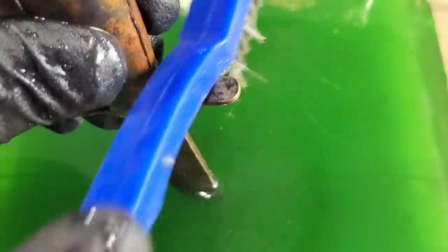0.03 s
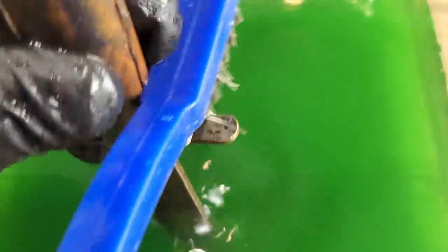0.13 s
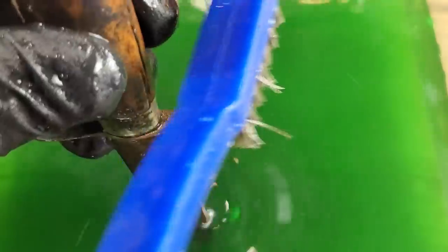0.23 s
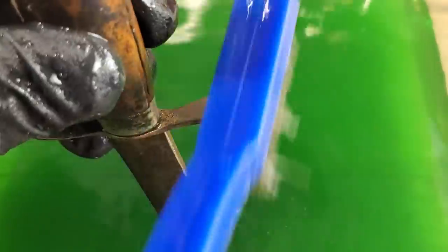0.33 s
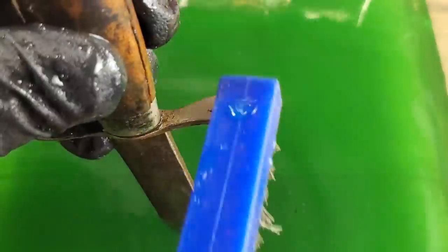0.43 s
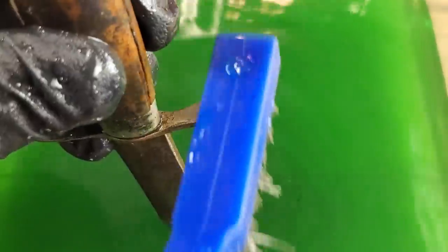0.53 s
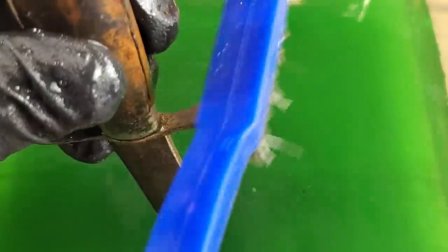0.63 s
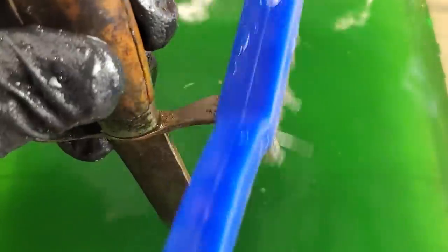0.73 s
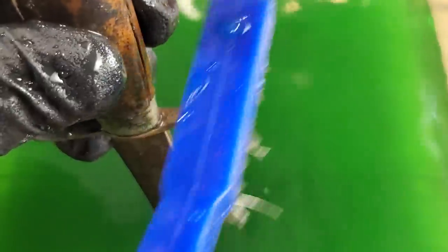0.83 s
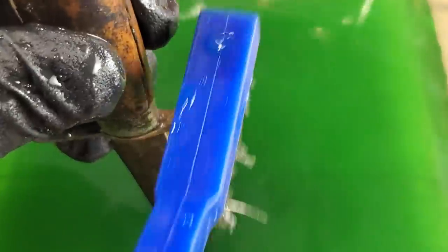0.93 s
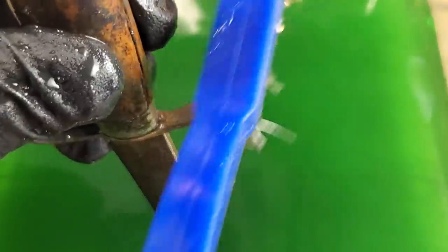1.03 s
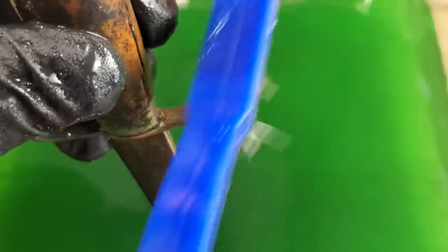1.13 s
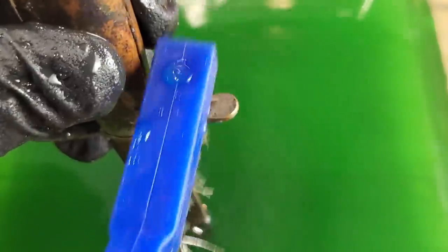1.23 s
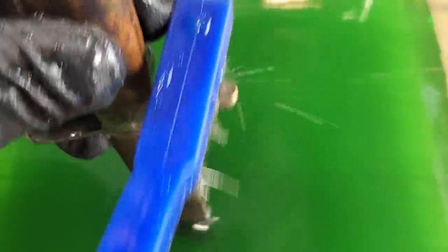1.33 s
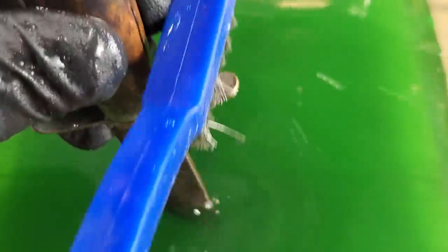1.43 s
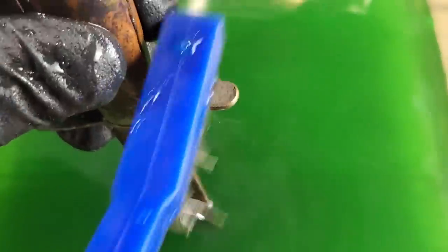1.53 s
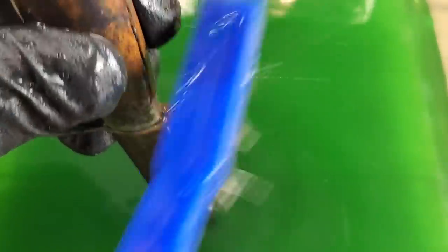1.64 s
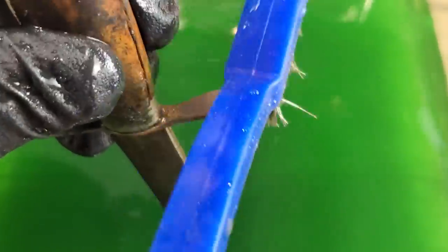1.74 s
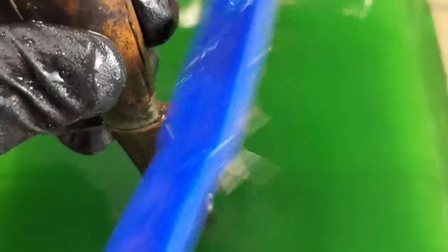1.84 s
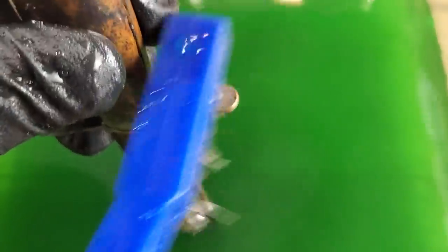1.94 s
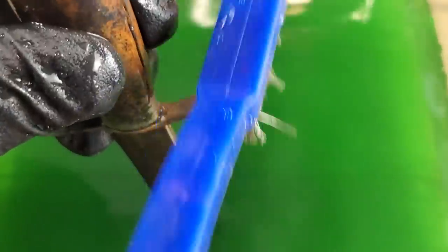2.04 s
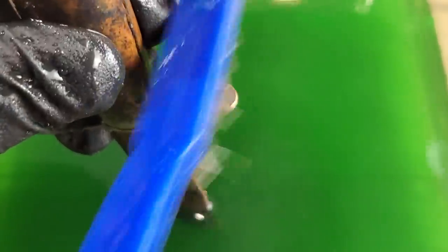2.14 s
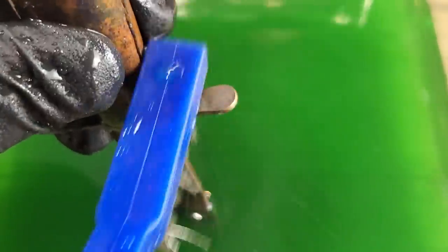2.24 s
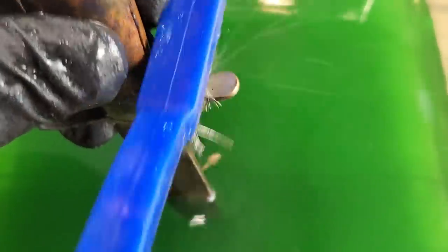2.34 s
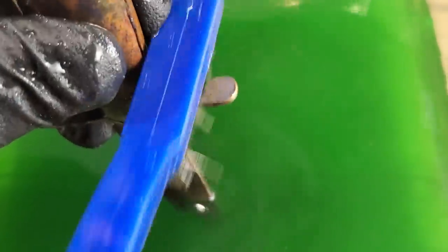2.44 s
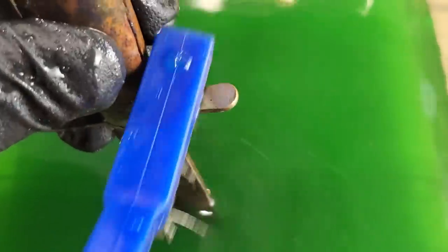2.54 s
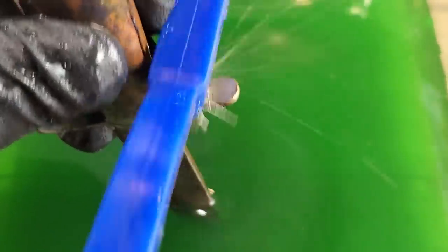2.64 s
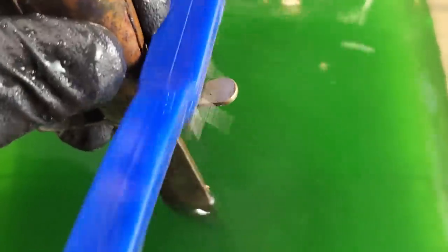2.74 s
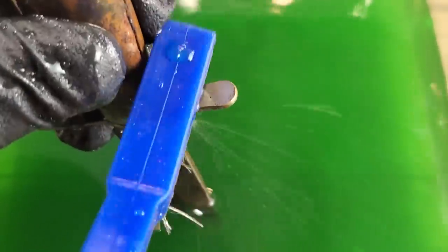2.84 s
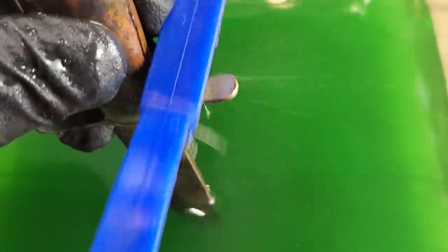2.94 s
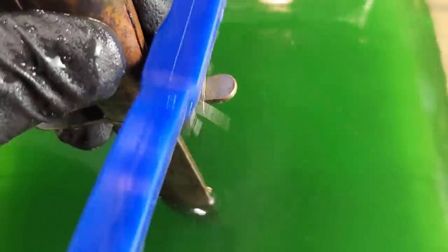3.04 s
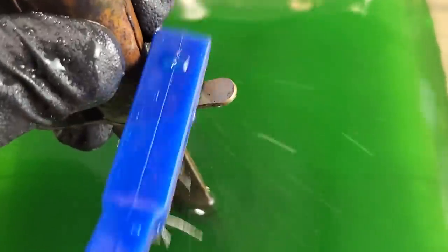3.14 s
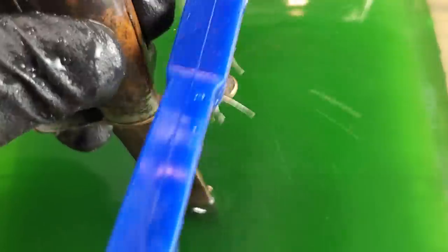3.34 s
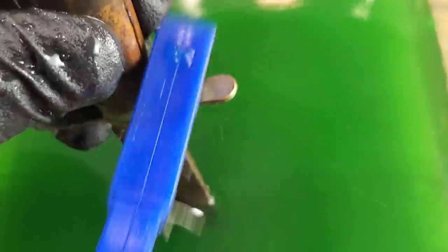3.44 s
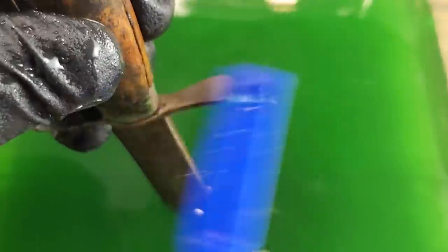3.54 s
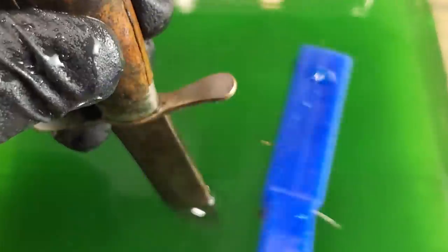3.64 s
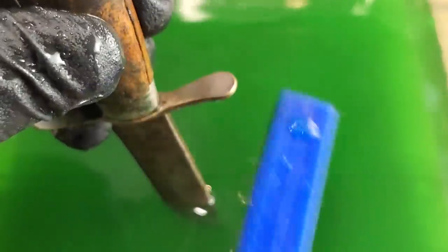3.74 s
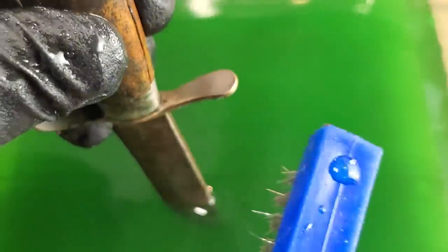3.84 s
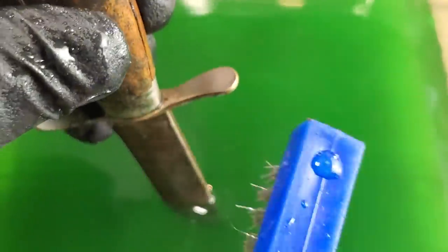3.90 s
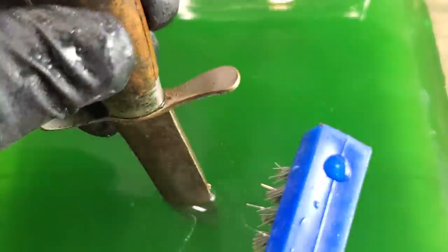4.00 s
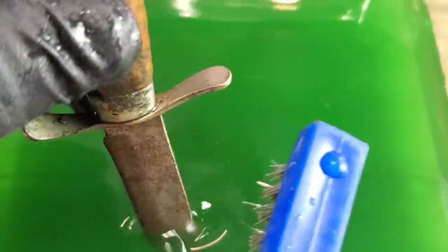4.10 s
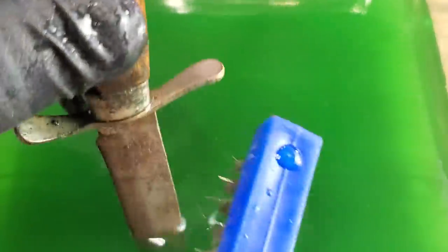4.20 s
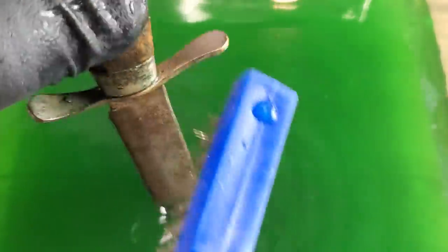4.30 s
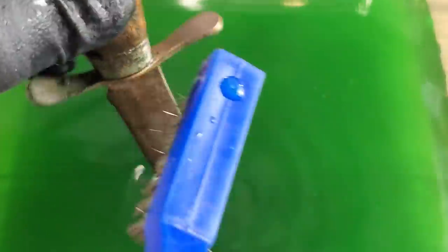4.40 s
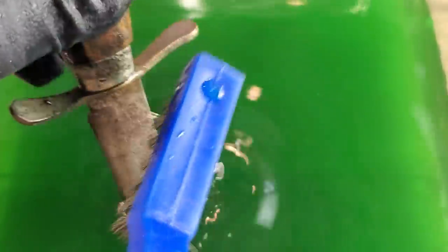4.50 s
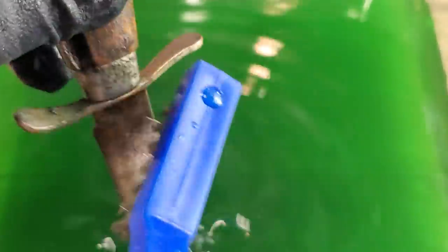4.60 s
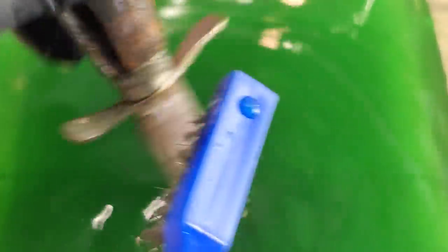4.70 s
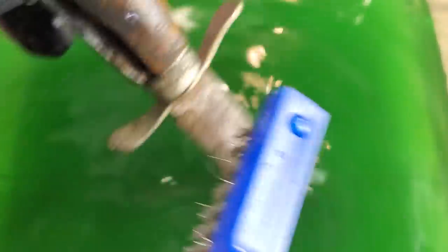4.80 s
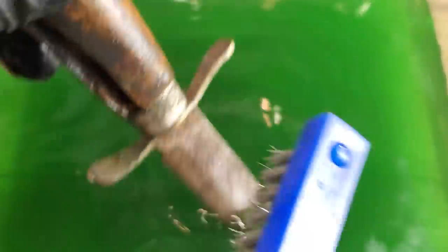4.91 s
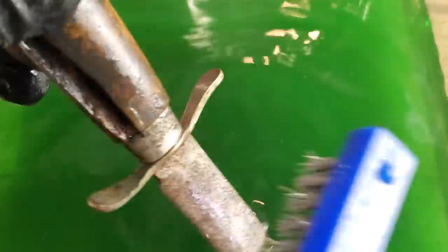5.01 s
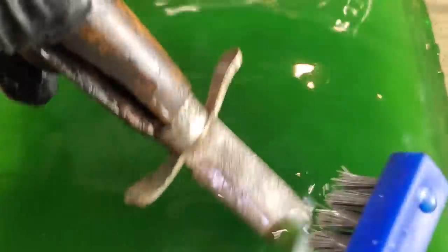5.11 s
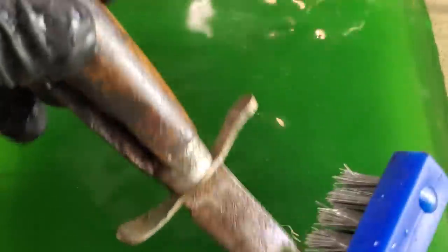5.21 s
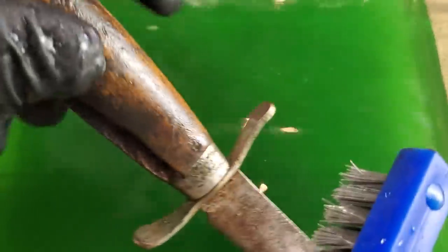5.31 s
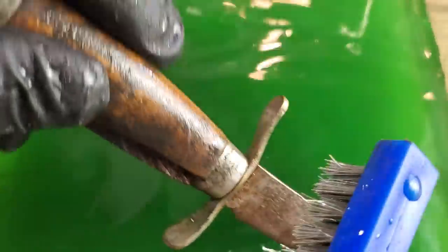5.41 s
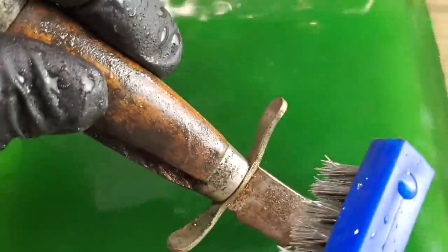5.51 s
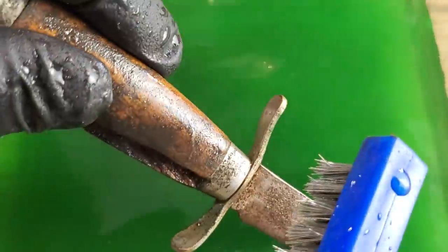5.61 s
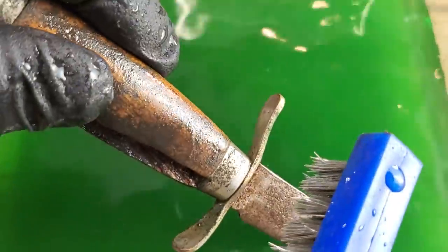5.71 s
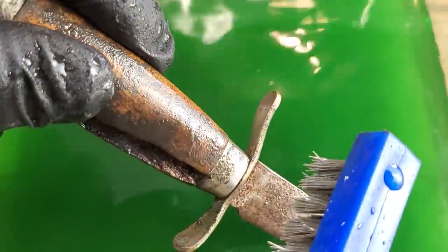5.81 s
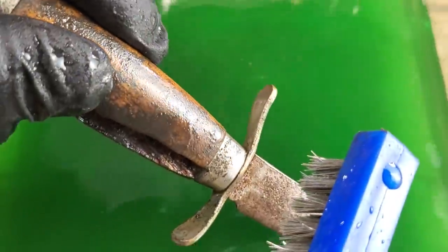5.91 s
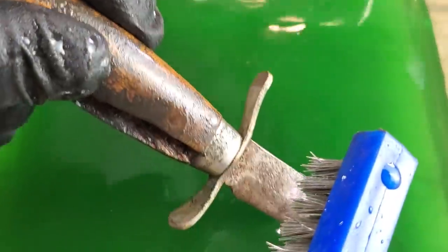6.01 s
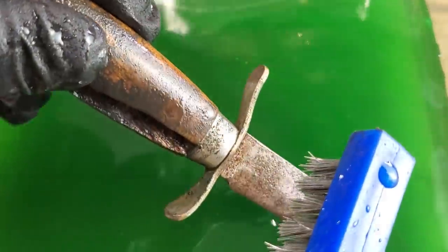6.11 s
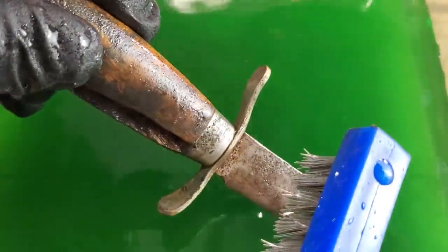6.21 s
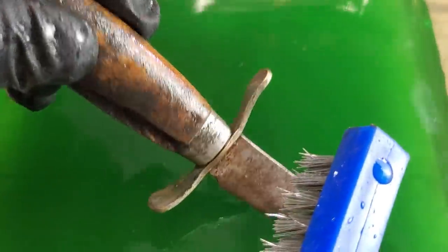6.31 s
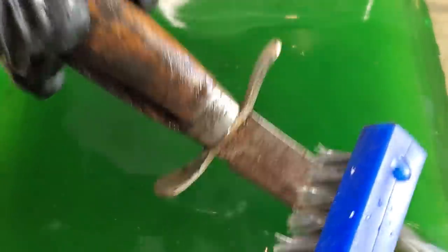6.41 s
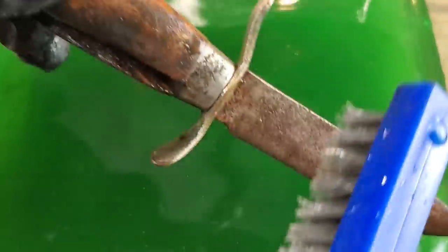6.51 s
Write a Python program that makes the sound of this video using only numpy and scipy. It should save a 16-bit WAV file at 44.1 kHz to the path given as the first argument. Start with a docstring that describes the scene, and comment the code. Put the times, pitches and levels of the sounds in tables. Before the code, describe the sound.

Very close stereo: a wire brush scrapes a wet rusty blade, first in broken strokes, then in a fast steady back-and-forth rasp of bright hiss, gritty scratch and sharp snags over a low tray thud. At about three and a half seconds it stops. Small clicks follow, then two clear metallic knocks of the blade tip on the tray, a fainter one, and almost silence with slight rubbing.

```python
"""Scrubbing a rusty blade over a tray

A wire brush scrubs a wet rusty blade held over a shallow tray, in quick strokes to and fro.
The wires slip and snag in clumps: random clicks, filtered into hiss and scratch, shake brush, blade and tray.
Later the blade tip knocks, a sum of fading sines and a crack, and slides on the tray bottom, as filtered clicks.
Two close microphones each hear it by their own short paths off the liquid and the tray walls."""
import sys
import numpy as np
from scipy import signal
from scipy.fft import rfft, irfft
from scipy.io import wavfile
from scipy.ndimage import uniform_filter1d

SR = 44100
rng = np.random.default_rng(int(sys.argv[2]) if len(sys.argv) > 2 else 0)


def master_out(mix):
    """Clip the mix to full scale and print it as 16-bit PCM to the path in sys.argv[1]."""
    frames = np.transpose(np.atleast_2d(mix))
    ceiling = np.clip(frames, -1, 1)
    pcm = np.round(ceiling * 32767).astype(np.int16)
    wavfile.write(sys.argv[1], SR, pcm)


def voltage_ratio(decibels):
    """Convert decibels (scalar or array-like) to amplitude ratios, 20 dB per decade."""
    exponent = np.asarray(decibels, float) / 20
    return 10 ** exponent


N = 288855   # length in samples

# Levels in the tables are relative: later filters, paths and mixing still act on them.

# faint high squeaks: start t/s, length t/s, first f/Hz, last f/Hz, level/dB
SQUEAKS = [(5.732, 0.033, 9250, 9300, -92), (5.803, .15, 10600, 10250, -74), (6.12, 0.059, 9750, 9600, -78)]
# low modes of the tray: f/Hz, level/dB, time to fade by 60 dB t/s
TRAY_MODES = [(48, -7, 0.22), (78.4, -20, 0.51), (123.36, 5.5, 0.36), (178.1, -2.5, 0.42), (205.8, 2, 0.22),
              (274, 5.5, 0.1), (348, -7, 0.17), (405.2, -3, 0.17), (477, -14, 0.12)]
# thumps that reach the tray: t/s, bottom level/dB, walls level/dB (at 200 Hz)
THUMPS = [(0.018, -38.5, -39.5), (0.564, -45, -44), (0.864, -37.5, -41.5), (0.897, -46, -41),
          (1.34, -30.5, -39.5), (1.537, -42, -65), (1.677, -37.5, -73), (2.293, -34, -51),
          (2.561, -37.5, -66.5), (2.917, -36, -55), (2.949, -37.5, -59.5), (3.101, -43, -53.5),
          (3.22, -35.5, -65), (3.278, -44, -44), (3.688, -38, -38), (3.718, -38, -34), (3.735, -38.5, -32),
          (3.795, -45, -46.5), (4.415, -45, -39.5), (4.639, -33, -29.5), (4.835, -49.5, -52),
          (5.141, -45, -37), (5.161, -59, -36.5), (5.181, -44, -41), (5.224, -44, -68),
          (5.293, -44.5, -57.5)]
# faint rubbing of the tip and rustle of the resting wires: t/s, rub level/dB, rustle level/dB
SLIDE = [(0.0, -50.5, -67), (0.26, -59.5, -81), (0.53, -57.5, -79.5), (0.7, -55, -83), (0.85, -65.5, -80),
         (0.93, -58, -68), (3.5, -58.5, -61), (3.58, -67, -82), (3.68, -70.5, -89), (3.74, -75, -66.5),
         (4.0, -58, -76.5), (4.05, -57, -64), (4.2, -56.5, -73.5), (4.4, -59, -72.5), (4.62, -61.5, -67),
         (4.72, -73.5, -57), (4.83, -60.5, -80), (4.95, -62.5, -67), (5.0, -84.5, -85),
         (5.13, -64.5, -74.5), (5.16, -56, -62), (5.27, -63.5, -67.5), (5.39, -69, -74), (5.47, -80, -84.5),
         (5.65, -63, -93.5), (5.8, -61, -80), (6.05, -60, -75.5), (6.25, -63.5, -84), (6.55, -65, -78)]
# tone of the rubbing tip: f/Hz, level/dB (per Hz)
RUB_TONE = [(180, -38), (300, -7), (579, -9.5), (777, -17.5), (2520, -8.5), (4500, -13.5), (6800, -25.5),
            (7400, -30.5), (11000, -53.5), (18700, -120)]
# resonances of the half-drowned blade under a slow rub: f/Hz, width f/Hz, level/dB
DROWNED_BLADE = [(561, 84, 0), (1050, 1200, 1), (2578, 85, -6), (3650, 100, -7), (4780, 79, -13),
                 (5600, 210, -23.5), (7060, 380, -11)]
# tone of the rustling wires: f/Hz, level/dB (per Hz)
RUSTLE_TONE = [(2000, -20.5), (5000, -2.5), (9000, -8.5), (13500, -6), (15700, -6.5), (16400, -36.5)]
# tone of the tray rumbling under the tip: f/Hz, level/dB (per Hz)
RUMBLE_TONE = [(12, -36), (20, -18.5), (48, -6), (97, -3.5), (128, 1), (201, -19), (289, -10), (400, -27),
               (520, -31), (880, -120)]
# blade tip on the tray: t/s, peak level/dB, hardness (tilt in dB per octave),
# ring length as a share of each mode's fading time, crack level/dB (against the peak)
KNOCKS = [(3.6882, -28, 2.5, 0.57, 1), (3.7203, -33, -6, 0.4, -11), (3.737, -26, -1.5, 0.37, 1),
          (3.792, -52.5, 14.5, 0.5, 1), (3.897, -57.5, 14, 0.52, -3), (4.0273, -42.5, 4, 0.9, -10),
          (4.0457, -45.5, 1.5, 0.87, -3), (4.1276, -42.5, 2, 0.52, -6.5), (4.4137, -13, -0.2, 0.54, -9),
          (4.6369, -16.5, 2.4, 0.51, -2.5), (4.7157, -33.5, 5.5, 0.51, -7),
          (4.8355, -39.5, -2.5, 0.62, 3.5), (4.928, -58, 4.5, 1, 4), (5.1385, -27, 5, 0.44, -4.5)]
# which of the four spots of the blade each knock lands on: spot number
KNOCK_SPOTS = [0, 0, 0, 0, 0, 1, 2, 3, 1, 2, 1, 3, 3, 3]
# blade modes: f/Hz
BLADE_HZ = [603, 1217, 1381, 1460, 1866, 1895, 2537, 3237, 3762, 3973, 4540, 5632, 5900, 6050, 6735, 6866,
            8130, 8460, 9080, 9455]
# the same modes: time to fade by 60 dB t/s (before the share), level/dB when struck at each of four spots
BLADE_MODES = [(0.21, -10.5, -32.5, -12.5, -6.5), (0.25, -30, -2, -1.5, -49), (0.64, -29, -10, -7, -5),
               (0.074, 1.5, -34.5, -29, -33), (0.41, -1.5, -11.5, -34.5, -10), (0.1, 11.5, 0, -19, -26),
               (0.091, -22, -0.5, -13.5, -9), (0.42, -3.5, -9, -14, -12), (0.14, 0.5, -14, 4, -5),
               (0.13, -30, -13, -19.5, -12), (0.14, -13.5, -19, -14.5, -17.5), (0.13, -25, -20, -17, -10.5),
               (0.1, -34, -31.5, -20.5, -10), (0.15, -7.5, -16.5, -30, -5.5), (0.15, -24, -25.5, -10, -17),
               (0.066, -18, -25, -19, -12.5), (.12, -40, -36, -30, -25), (0.087, -24, -36.5, -24, -17),
               (0.029, -27, -37, -26.5, -18), (0.089, -38, -32, -33, -14.5)]
# strokes of the brush from turn to turn: start t/s, length t/s, share of the way where it is fastest
# (held within 0.1 to 0.9), hiss of the wire tips level/dB, scratch of the shanks level/dB
STROKES = [(0.003, 0.036, 0.43, -51, -48.5), (0.052, 0.12, 1, -44.5, -45.5),
           (0.334, 0.058, 0.25, -76, -63.5), (0.537, 0.15, 0.74, -50, -50), (0.686, 0.11, 0.54, -63, -65),
           (0.898, 0.2, 0.43, -43.5, -50.5), (1.088, 0.14, 0.77, -40, -48), (1.237, .15, 0.98, -39, -48),
           (1.436, 0.13, 0.61, -42.5, -50), (1.557, 0.17, 0.7, -41.5, -47.5),
           (1.733, 0.16, 0.57, -49.5, -56), (1.906, 0.13, 0.88, -40.5, -50), (2.046, 0.15, 0.77, -41, -48),
           (2.23, 0.13, 0.56, -35.5, -42), (2.379, 0.12, 0.67, -39.5, -45.5),
           (2.525, 0.14, 0.36, -35.5, -40), (2.69, 0.14, 0.7, -39.5, -45.5), (2.846, 0.13, 0.54, -35, -41),
           (3.003, 0.14, 0.55, -40, -45.5), (3.156, 0.14, 0.64, -39.5, -43.5),
           (3.311, 0.17, 0.65, -42, -46), (3.487, 0.043, 0.6, -68, -45.5)]
# how hard the hand presses the brush on the blade: t/s, level/dB
GRIP = [(0.0, -44), (0.17, -37), (0.36, -56), (0.6, -41.5), (0.76, -51.5), (1.0, -40), (1.3, -38),
        (1.9, -38.5), (2.15, -35.5), (2.6, -37), (3.3, -36), (3.45, -37.5), (3.52, -28.5)]
# bunches of wires catching on an edge: t/s, hiss peak level/dB, jolt in the brush back level/dB
SNAGS = [(0.0112, -37, -54), (0.0663, -56, -28.5), (0.356, -59, -46.5), (0.37, -61, -52), (0.444, -62, -73),
         (0.5465, -53, -40), (0.5639, -36.5, -35), (0.62, -31, -70), (0.651, -29, -40), (0.737, -54, -47.5),
         (0.8609, -44, -26.5), (1.1206, -54, -34.5), (1.2855, -29.5, -62), (1.311, -25.5, -73),
         (1.3419, -17.5, -30), (1.4728, -33, -49), (1.627, -48.5, -69), (1.7082, -44, -39.5),
         (1.989, -54.5, -49), (2.1447, -57.5, -28), (2.1701, -25, -50), (2.252, -28.5, -60.5),
         (2.2953, -19, -32), (2.5603, -20, -67), (2.601, -25, -32), (2.7127, -31, -31.5),
         (2.881, -33, -36.5), (2.9232, -34, -99), (3.183, -28.5, -67), (3.2255, -22.5, -35.5),
         (3.2768, -26, -47), (3.5003, -31.5, -61), (5.949, -63, -85), (6.353, -69.5, -83)]
# tone of the slipping wires: f/Hz, level/dB (per Hz)
WIRE_TONE = [(1290, -50), (2200, -9), (2450, -11.5), (2680, -7.5), (3160, -9), (3490, -9), (4740, -14),
             (6760, -10), (7710, -23), (8720, -12.5), (12000, -9), (14300, 2.5), (14900, 0.5), (15800, -19)]
# resonances of the brush back pressed on the blade: f/Hz, width f/Hz, level/dB
PRESSED_BACK = [(510, 44, -7.5), (807, 110, -1.5), (1057, 66, -1.5), (1333, 57, 3), (1877, 66, -8),
                (2600, 60, -14.5), (3440, 3600, -10.5)]
# paths to each microphone: delay t/ms (before stretching), gain (signed factor)
PATHS_LEFT = [(.0, 0.97), (.35, 0.07), (1.1, -0.084), (2.2, 0.091)]
PATHS_RIGHT = [(.2, 0.39), (.62, -0.12), (1.0, 0.15), (1.8, 0.17), (3.1, 0.27)]
# tone of the left side over the right: f/Hz, level/dB
LEFT_OVER_RIGHT = [(60, 0.5), (150, 0.5), (380, 2), (700, 2), (1200, 4.5), (2380, 2), (5000, 7.5),
                   (9000, -4.5), (15000, 3)]

HISS_DB = -82   # self-noise of each microphone
BOTTOM_BELOW_HZ = 145   # lower tray modes belong to the bottom, the others to the walls
THUMP_CONTACT_S, WALL_TILT_DB_PER_OCTAVE = 0.00035, -4.5
RATTLE_DB, RATTLE_S = -45.5, 0.0059   # the wires rattle at every knock, this far below its peak
HISS_POWER, SCRATCH_POWER, PRESS_POWER = 1.09, 1, 0.58   # loudness grows as a power of the speed
TURN_HISS_DB, TURN_HOLD_S = -60.5, 0.03   # the wire tips still drag while the hand turns
SNAG_S = 0.0026   # how fast the hiss of a snag dies away
ALIKE_BELOW_HZ, PATHS_BELOW_HZ = 490, 7300   # both sides alike below; only the straight path above
ROOM_DB, ROOM_T60_S = -18, 0.2
CUTOFF_HZ = 17100   # the treble is 70 dB down from here


def rms_one(x):
    """Scales a sound to an average strength (rms) of 1."""
    return x / np.sqrt(np.mean(x ** 2) + 1e-30)


def butter(order, hz, kind, x):
    """Lets only the low, high or middle part of a sound through."""
    return signal.sosfilt(signal.butter(order, hz, kind, fs=SR, output="sos"), x)


def colour(x, spectrum):
    """Filters with a (Hz, dB) table, never ahead of time: minimum phase by folding the cepstrum."""
    hz, db = np.transpose(spectrum)
    grid = np.maximum(np.arange(4097) * SR / 8192, 1)
    cepstrum = irfft(np.log(voltage_ratio(np.interp(np.log(grid), np.log(hz), db))))
    cepstrum[1:4096] *= 2
    cepstrum[4097:] = 0
    return signal.fftconvolve(x, irfft(np.exp(rfft(cepstrum))))[:N]


def drift(rate_hz):
    """Slow random wandering with spread 1: noise smoothed twice."""
    r = np.exp(-2 * np.pi * rate_hz / SR)
    wander = signal.lfilter([1], [1, -2 * r, r * r], rng.standard_normal(N + SR))
    return rms_one(wander[SR:])   # the first second only settles the filter


def ring(clicks, hz, t60):
    """A unit click sets a sine of height 1 ringing, which fades by 60 dB in t60 seconds."""
    r, w = voltage_ratio(-60 / (t60 * SR)), 2 * np.pi * hz / SR
    return signal.lfilter([0, np.sin(w)], [1, -2 * r * np.cos(w), r * r], clicks + 1e-18)


def resonances(x, table, wander_db):
    """Resonances side by side, each swelling on its own as the grip shifts; rms 1."""
    total = np.zeros(N)
    for k, (hz, width, db) in enumerate(table):
        gain = (-1) ** k * voltage_ratio(db + wander_db * drift(2.9)) * np.sqrt(width)
        total += gain * ring(x, hz, np.log(9) / width)   # a narrow resonance rings for longer
    return rms_one(total)


def bursts(times, db, decay_s):
    """A loudness curve that jumps at each time and dies away."""
    clicks = np.zeros(N)
    clicks[np.round(np.array(times) * SR).astype(int)] = voltage_ratio(db)
    return signal.lfilter([1], [1, -np.exp(-1 / (decay_s * SR))], clicks + 1e-18)


def curves(rows):
    """Smoothly joined gain curves through rows of (s, dB, ..)."""
    s, *columns = np.transpose(rows)
    t = np.arange(N) / SR
    return [np.interp(t, s, voltage_ratio(column / 2)) ** 2 for column in columns]


def slips(per_s, spread_db, clump_db, clump_rate):
    """Clicks of sticking and slipping, of random size and sign, that come in clumps; rms 1."""
    sizes = voltage_ratio(spread_db * np.minimum(rng.exponential(1, N), 5)) * rng.choice([-1, 1], N)
    happens = rng.random(N) < per_s / SR
    return rms_one(sizes * happens * voltage_ratio(clump_db * drift(clump_rate)))


def microphone_noise(near):
    """Each microphone has its own steady hiss, and a low rumble that swells when the tray shakes."""
    rumble = butter(2, [35, 140], "band", rng.standard_normal((2, N)))
    bass = butter(2, 200, "low", near)
    shaking = np.sqrt(uniform_filter1d(bass ** 2, size=2048) + 1e-18)
    rumble_level = voltage_ratio(-75.5) + voltage_ratio(-13.5) * shaking
    return rumble_level * rms_one(rumble) + voltage_ratio(HISS_DB) * rng.standard_normal((2, N))


def squeaks():
    """Thin gliding tones: sines that swell, fade and waver in strength."""
    t, out = np.arange(N) / SR, np.zeros(N)
    for start, length, first_hz, last_hz, db in SQUEAKS:
        way = np.clip((t - start) / length, 0, 1)
        hz = first_hz + (last_hz - first_hz) * way
        out += voltage_ratio(db) * np.sin(np.pi * way) * np.sin(2 * np.pi * np.cumsum(hz) / SR)
    return out * voltage_ratio(3.0 * drift(40))


def sliding():
    """Faint rubbing of the tip rings the damped blade and rumbles in the tray; the wires rustle."""
    rub, rustle = curves(SLIDE)
    s, peak_db = np.transpose(KNOCKS)[:2]
    rustle = rustle + bursts(s, peak_db + RATTLE_DB, RATTLE_S)
    grit = slips(6000, spread_db=2.0, clump_db=0.8, clump_rate=30)
    blade = resonances(grit, DROWNED_BLADE, wander_db=1.2)
    tip = rms_one(rms_one(colour(grit, RUB_TONE)) + voltage_ratio(-1.0) * blade)
    rustles = []
    for _ in range(2):   # the near and the far end of the brush
        wires = slips(7000, spread_db=2.6, clump_db=2.0, clump_rate=45)
        rustles.append(rustle * rms_one(colour(wires, RUSTLE_TONE)))
    rumble = (voltage_ratio(-66) + rub) * rms_one(colour(rng.standard_normal(N), RUMBLE_TONE))
    return rub * tip + rumble + rustles[0], rustles[1]


def tray(shake):
    """The shaking of the hands and the thumps ring the low modes of the tray."""
    s, bottom_db, wall_db = np.transpose(THUMPS)
    out = np.zeros(N)
    for hz, db, t60 in TRAY_MODES:
        if hz < BOTTOM_BELOW_HZ:
            blow_db = bottom_db
        else:
            blow_db = wall_db + WALL_TILT_DB_PER_OCTAVE * np.log2(hz / 200)
        blows = bursts(s, blow_db, THUMP_CONTACT_S) / (THUMP_CONTACT_S * SR)
        out += voltage_ratio(db) * ring(blows + shake, hz, t60)
    return butter(4, 48, "high", out)


def knocks():
    """Each knock strikes the blade modes as strongly as they move at its spot, and adds a crack."""
    s, peak_db, tilt_db, share, crack_db = np.transpose(KNOCKS)
    signs = rng.choice([-1, 1], (len(KNOCKS), len(BLADE_MODES)))
    t, out = np.arange(SR // 2) / SR, np.zeros(N + SR)
    hz = np.array(BLADE_HZ)[:, None]
    t60, *spot_db = np.transpose(BLADE_MODES)[:, :, None]
    for k, at in enumerate(np.round(s * SR).astype(int)):
        # a harder contact tilts the blow towards the high modes
        strength = voltage_ratio(peak_db[k] + spot_db[KNOCK_SPOTS[k]] + tilt_db[k] * np.log2(hz / 2500))
        decay = voltage_ratio(-60 * t / (t60 * np.clip(share[k], 0.15, 2)))
        modes = signs[k][:, None] * strength * decay * np.sin(2 * np.pi * hz * t)
        out[at:at + len(t)] += modes.sum(axis=0) * (1 - np.exp(-t / 0.00024))   # the contact builds up
    crack_tone = [(150, -15.0), (400, -1), (900, 14.5), (2500, 10), (7000, -9), (15000, -22.5)]   # (Hz, dB)
    crack = rms_one(colour(rng.standard_normal(N), crack_tone))
    first = bursts(s, peak_db + crack_db, 0.0063)
    tail = bursts(s, peak_db + crack_db - 22.0, 0.031)
    return out[:N] + crack * (first + tail)


def strokes():
    """The brush speeds up and slows down in every stroke; hiss, scratch and pressure follow its speed."""
    t, (hiss, scratch, touch) = np.arange(N) / SR, np.zeros((3, N))
    for start, length, fastest, hiss_db, scratch_db in STROKES:
        marks = start + length * np.array([0, np.clip(fastest, 0.1, 0.9), 1])
        way = np.interp(t, marks, [0, 0.5, 1])
        speed = np.abs(np.sin(np.pi * way))   # 1 at the fastest point
        hiss += voltage_ratio(hiss_db) * speed ** HISS_POWER
        scratch += voltage_ratio(scratch_db) * speed ** SCRATCH_POWER
        touch = np.maximum(touch, speed)
    grip, = curves(GRIP)
    r = np.exp(-1 / (TURN_HOLD_S * SR))
    drag = signal.lfilter([1 - r], [1, -r], touch) * grip / grip.max()
    return hiss + voltage_ratio(TURN_HISS_DB) * drag, scratch, grip * touch ** PRESS_POWER


def brushing():
    """Wire slips hiss and scratch at both ends of the brush, through the pressed brush back and the tray."""
    hiss, scratch, pressure = strokes()
    s, hiss_db, jolt_db = np.transpose(SNAGS)
    snags, clumps = bursts(s, hiss_db, SNAG_S), voltage_ratio(2.8 * drift(60))
    pressure = pressure + bursts(s, jolt_db, 0.012)
    split_hz = 7600   # the thin tips of the wires hiss above, their shanks scratch below
    ends = []
    for body_db in (-1.5, -6):   # near end, far end
        grains = slips(9000, spread_db=4.0, clump_db=-1.5, clump_rate=360)
        flicks = slips(460, spread_db=1.0, clump_db=2.0, clump_rate=35)   # single wires spring free
        wires = colour(grains + voltage_ratio(-0.5) * flicks, WIRE_TONE)
        # a snag is so many slips at once that they blur into noise
        bunch = colour(rng.standard_normal(N), WIRE_TONE)
        tips = hiss * clumps * rms_one(butter(4, split_hz, "high", wires))
        tips += snags * rms_one(butter(4, split_hz, "high", bunch))
        shanks = scratch * clumps * rms_one(butter(4, split_hz, "low", wires))
        shanks += voltage_ratio(-12) * snags * rms_one(butter(4, split_hz, "low", bunch))
        back = pressure * resonances(grains * clumps, PRESSED_BACK, wander_db=1.2)
        ends.append(tips + shanks + voltage_ratio(body_db) * back)
    shake = voltage_ratio(-32.5) * scratch * slips(900, spread_db=1.0, clump_db=1.5, clump_rate=32)
    return ends[0] + tray(shake), ends[1]


def room(x):
    """A little room follows: the sound smeared over fading noise that starts 5 ms later."""
    t = np.arange(SR // 4) / SR
    echo = rng.standard_normal(len(t)) * voltage_ratio(-60 * t / ROOM_T60_S) * (t > 0.005)
    echo = butter(1, [400, 7000], "band", echo)
    return signal.fftconvolve(x, echo * voltage_ratio(ROOM_DB) / np.sqrt(np.sum(echo ** 2)))[:N]


def microphones(x, stretch, pan_db):
    """The bass arrives alike; above it each side sums its own paths, and a little room follows."""
    hz = np.fft.rfftfreq(1024, 1 / SR)
    alike = 1 / (1 + (hz / ALIKE_BELOW_HZ) ** 4)
    bounced = 1 / (1 + (hz / PATHS_BELOW_HZ) ** 8)
    centre = np.exp(-2j * np.pi * hz * 256 / SR)   # 256 samples of delay, cut off again below
    out = np.zeros((2, N))
    for side, paths in enumerate((PATHS_LEFT, PATHS_RIGHT)):
        sign = (-1) ** side   # left +, right -
        echoes = sum(gain * np.exp(-2j * np.pi * hz * ms * stretch / 1000) for ms, gain in paths)
        straight = voltage_ratio(pan_db / 2 * sign)
        echoes = echoes * bounced + straight * (1 - bounced)
        response = irfft(centre * (alike + (1 - alike) * echoes))
        heard = signal.fftconvolve(x, response)[256:N + 256] + room(x)
        out[side] = colour(heard, [(f, db / 2 * sign) for f, db in LEFT_OVER_RIGHT])
    return out


def scene():
    """Joins all sources; the far end of the brush has longer paths and its top treble more to the right."""
    near, far = brushing()
    rub, rustle = sliding()
    near = near + knocks() + rub + squeaks()
    sound = microphones(near, stretch=0.9036, pan_db=15.5)
    sound += microphones(far + rustle, stretch=1.5, pan_db=-11.0)
    return voltage_ratio(-0.5) * sound + microphone_noise(near)


def roll_off(x):
    """The treble ends steeply here."""
    return signal.sosfilt(signal.butter(12, 16820, fs=SR, output="sos"), x)


def record(dry):
    """A steep filter cuts the top of the treble."""
    mix = signal.sosfilt(signal.cheby2(12, 70, CUTOFF_HZ, fs=SR, output="sos"), dry)
    return roll_off(mix)


dry = scene()
out = record(dry)
master_out(out)
```